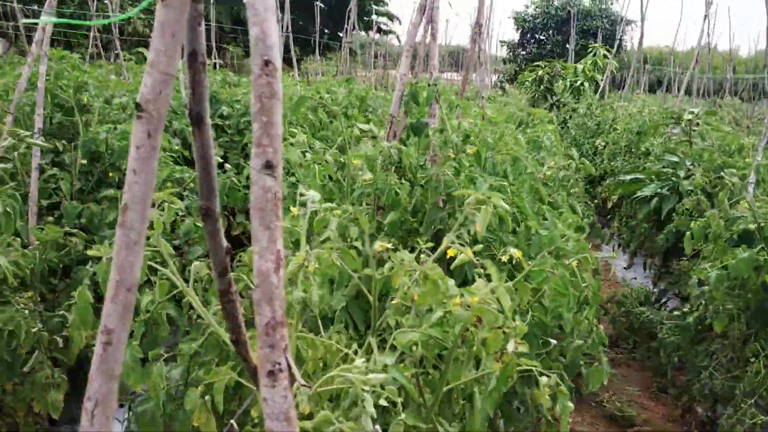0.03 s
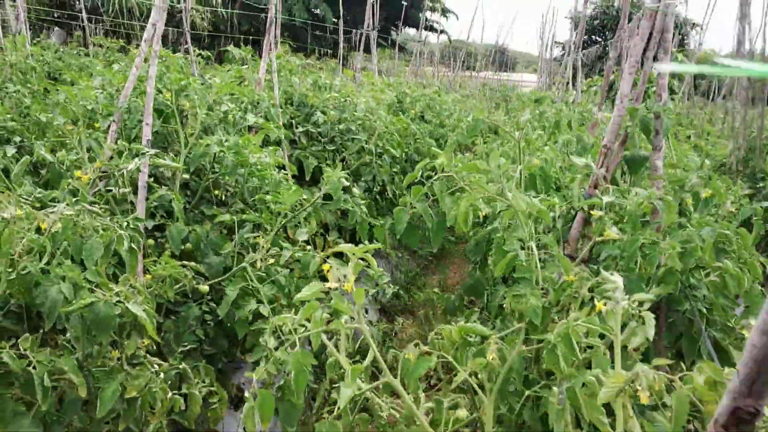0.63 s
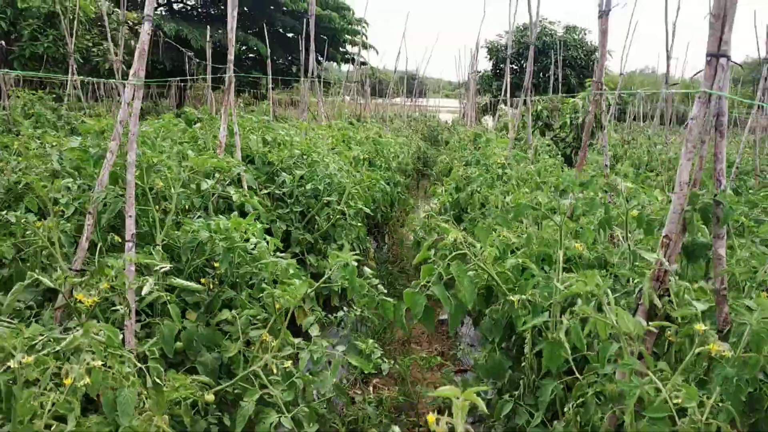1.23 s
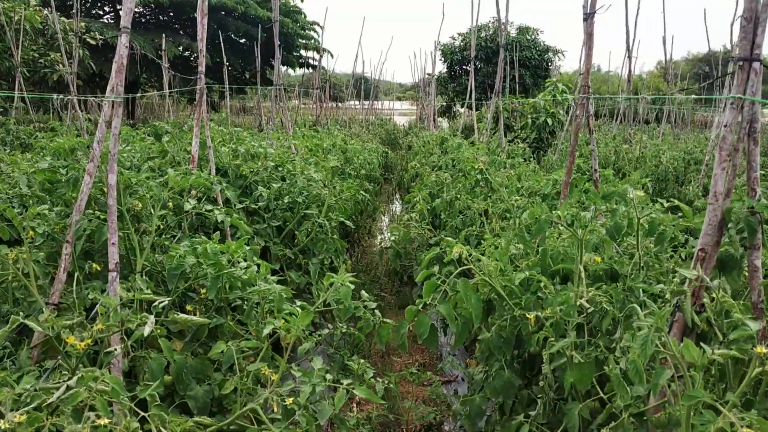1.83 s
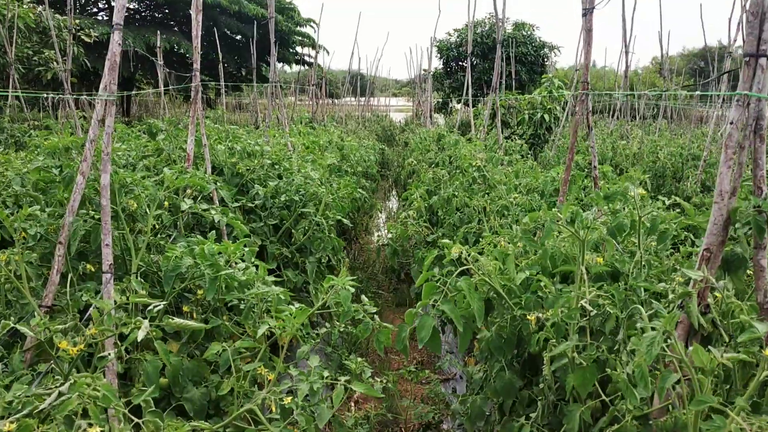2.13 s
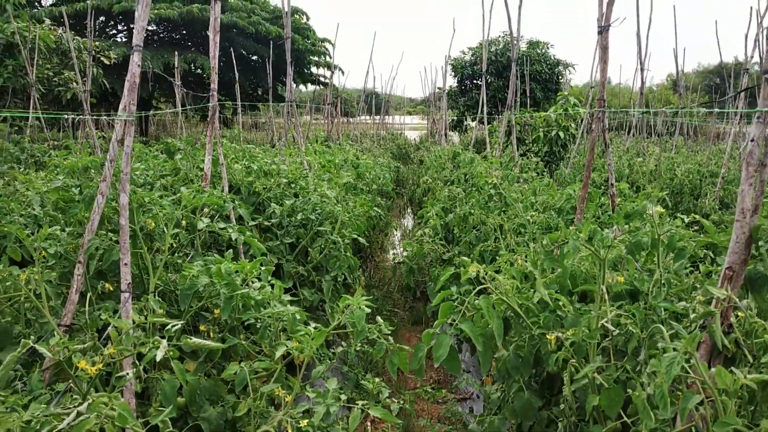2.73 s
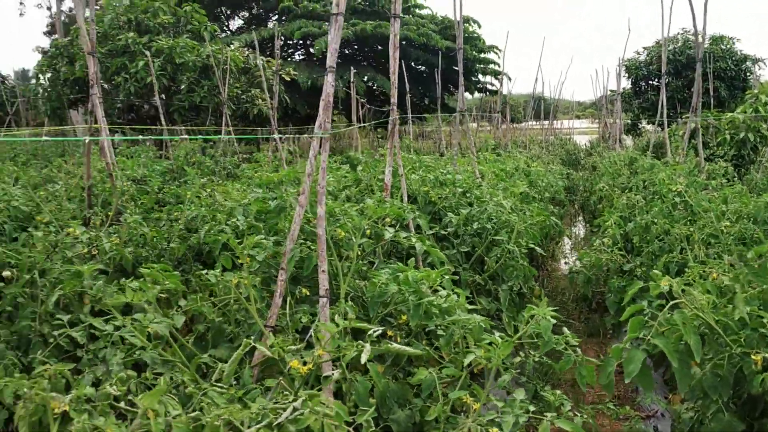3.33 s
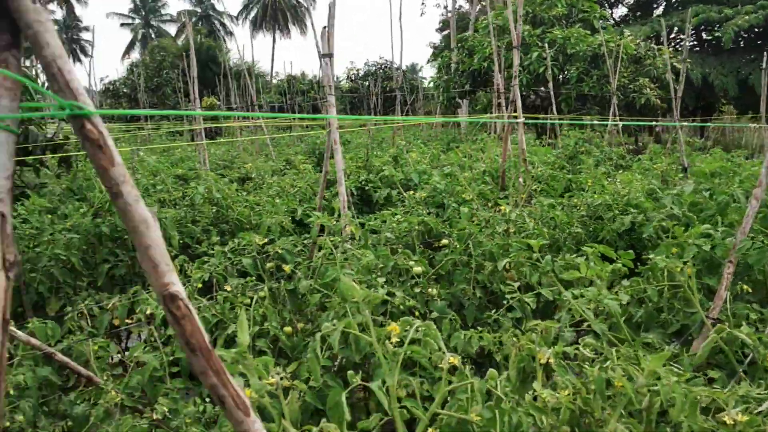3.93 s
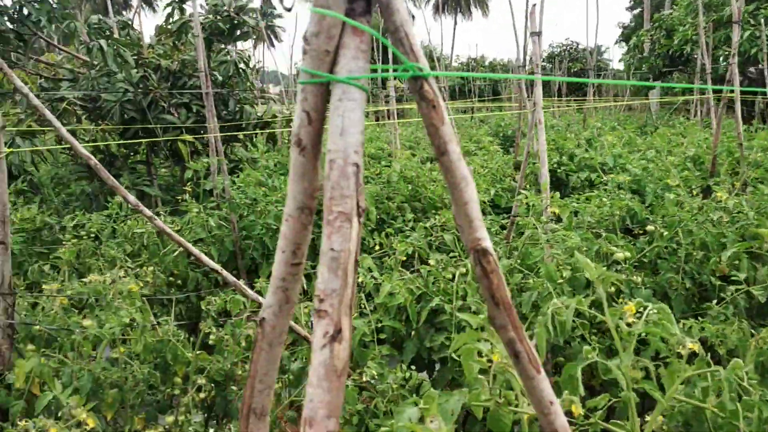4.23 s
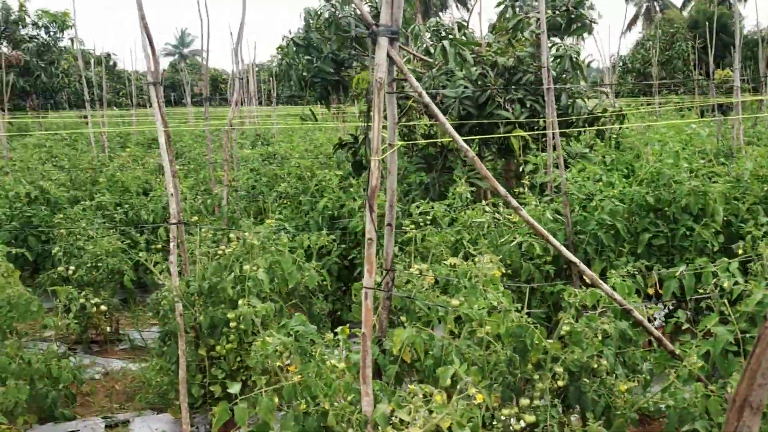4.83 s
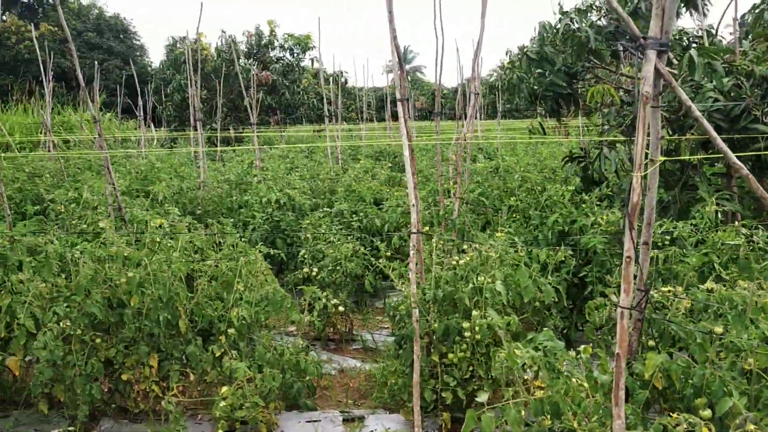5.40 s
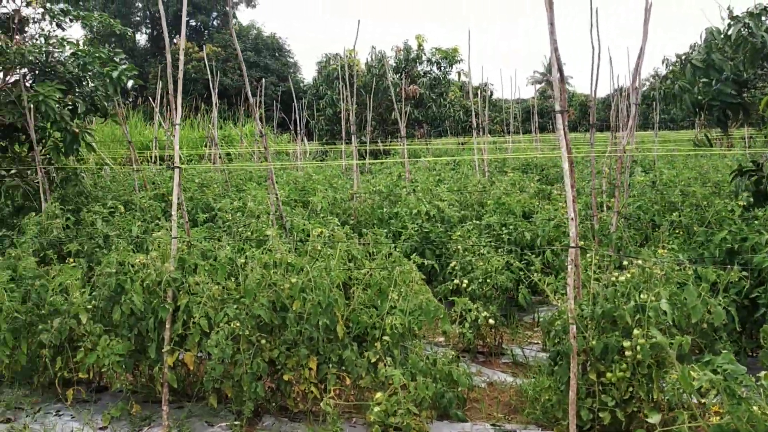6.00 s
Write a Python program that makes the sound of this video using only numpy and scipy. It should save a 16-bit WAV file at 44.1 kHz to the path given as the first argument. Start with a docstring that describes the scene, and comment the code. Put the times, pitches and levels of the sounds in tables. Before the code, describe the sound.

Foliage rustles and crackles close by at first, as a bird slightly to the left rasps and lets out sharp descending whistles. Once the rustling stops, a small bird farther off gives a quick six-part trill. More falling whistles follow, with light twittering, faint hoots and one distant hoarse call. Beneath it all lies the soft hush of an open field, with a breeze bumping the microphone in low puffs.

```python
"""Birds in a field ringed by trees

A near bird's syrinx gives harsh rasps and sharp falling whistles, which the foliage scatters.
Further off a small bird sings a rapid six-part trill; others chip and twitter, and faint hoots and
a hoarse call come from far away. At first leaves brush past, hissing and crackling by friction.
Eddies of breeze rumble on the two microphone ports, over the hush of the open field."""
import sys
import numpy as np
from scipy import signal
from scipy.fft import rfft, irfft
from scipy.io import wavfile
from scipy.ndimage import uniform_filter1d

SR = 44100
rng = np.random.default_rng(int(sys.argv[2]) if len(sys.argv) > 2 else 0)


def materialize(psi):
    """Save the field psi as 16-bit PCM at rate SR to the path in sys.argv[1].

    A 1-D psi becomes a single channel; in a 2-D psi each row is a channel.
    """
    bounded = np.clip(np.atleast_2d(psi).T, -1, 1)
    quanta = np.round(bounded * 32767).astype(np.int16)
    wavfile.write(sys.argv[1], SR, quanta)


N = 271645
TIME = np.arange(N) / SR


def from_db(db):
    """Amplitude ratio of a level in decibels."""
    return 10 ** (np.asarray(db) / 20)


def rms_one(x):
    """Normalisation to unit rms."""
    return x / np.sqrt(np.mean(x ** 2) + 1e-20)


def at_hz(points, hz):
    """Interpolation on a logarithmic frequency axis."""
    f, value = np.transpose(points)
    return np.interp(np.log(hz + 1e-6), np.log(f), value)


def coloured(x, spectrum):
    """Spectral shaping, to unit rms."""
    gain = from_db(at_hz(spectrum, np.fft.rfftfreq(N, 1 / SR)))
    return rms_one(irfft(rfft(x) * gain, N))


def band(x, low_hz, high_hz):
    """Second-order band-pass filtering."""
    return signal.sosfilt(signal.butter(2, [low_hz, high_hz], "band", fs=SR, output="sos"), x)


def drift(rate_hz):
    """Random fluctuation: low-pass noise of unit rms."""
    slow = signal.sosfilt(signal.butter(2, rate_hz, fs=SR, output="sos"), rng.standard_normal(N + SR))
    return rms_one(slow[SR:])


def surge(s, rise, fade):
    """Exponential growth to 1 at time s, then exponential decay."""
    t = TIME - s
    return np.exp(np.maximum(np.minimum(t / rise, -t / fade), -20))


def swell(start, attack, hold, release, db, depth_db=30):
    """An envelope linear in decibels: up by depth_db over the attack, down as much over the release."""
    t = TIME - start
    below = np.clip(np.maximum(1 - t / attack, (t - attack - hold) / release), 0, 4)
    return from_db(db - depth_db * below)


def noisy_tone(pitch, width_hz):
    """Narrow-band noise: two randomly modulated carriers in quadrature round a moving pitch."""
    phase = 2 * np.pi * np.cumsum(pitch) / SR
    return drift(width_hz) * np.sin(phase) + drift(width_hz) * np.cos(phase)


def glides(rows):
    """Linear frequency sweeps, each under a half-sine envelope."""
    out = np.zeros(N + SR)
    for s, length, start_hz, end_hz, db in rows:
        u, first = np.linspace(0, 1, int(length * SR)), int(s * SR)
        phase = 2 * np.pi * np.cumsum(start_hz + (end_hz - start_hz) * u) / SR
        out[first:first + len(u)] += np.sqrt(2) * from_db(db) * np.sin(np.pi * u) * np.sin(phase)
    return out[:N]


def balance(pan_db):
    """Level difference: gains that put the left port pan_db above the right."""
    return from_db([[pan_db / 2], [-pan_db / 2]])


def place(x, pan_db, lag_ms=0):
    """Direction as a level difference at constant power and a delay at the left port."""
    late = np.interp(TIME - lag_ms / 1000, TIME, x)
    return np.array([late, x]) * rms_one(balance(pan_db))


def scatter(x, near_db, near_t60, far_db, far_t60, pan_db):
    """Scattered sound alone: sparse early echoes off leaves and a diffuse tail from field and trees."""
    t = TIME[:SR]
    sparse = rng.standard_normal((2, SR)) * (rng.random((2, SR)) < 1500 / SR) * (t > .003)
    near = sparse * from_db(-60 * t / near_t60)
    far = rng.standard_normal((2, SR)) * from_db(-60 * t / far_t60) * np.minimum(t / .02, 1)
    echoes = sum(from_db(db) * part / np.linalg.norm(part, axis=1, keepdims=True)
                 for db, part in [(near_db, near), (far_db, far)])
    return signal.fftconvolve(x[None], echoes, axes=1)[:, :N] * balance(pan_db)


# Spectrum of the hush. Each row: frequency in Hz, relative density in dB.
AIR_SPECTRUM = [(24, -65), (40, -12.5), (140, -10.5), (193, 2), (242, -1), (500, -5), (728, -6.5),
                (1470, -10.5), (2030, -9.5), (2420, -7.5), (4410, -8.5), (5530, -11.5), (8400, -12),
                (9450, -8.5), (10300, -16), (15800, -14)]
# Its slow change. Each row: time in seconds, level in dB.
AIR_LEVEL = [(0, -48), (1.8, -51.5), (3.2, -51.5), (4.6, -52.5), (6.16, -51.5)]
# Its coherence. Each row: frequency in Hz, correlation between the ports.
AIR_COHERENCE = [(100, 0.35), (300, 0.63), (600, 0.55), (1500, 0.016), (4000, 0.0091), (15000, 0.011)]
# Its direction. Each row: frequency in Hz, left over right in dB.
AIR_BALANCE = [(60, -5), (110, -4.5), (200, 0.5), (380, 0), (700, 1), (1290, 1.5), (2380, 5.5), (4400, 3.5),
               (8120, 2), (15000, -1)]


def air():
    """The hush of the field is diffuse noise, partly coherent between the ports at long wavelengths."""
    hz = np.fft.rfftfreq(N, 1 / SR)
    mid, side = rfft(rng.standard_normal((2, N)))
    coherence, sign = at_hz(AIR_COHERENCE, hz), np.array([[1], [-1]])
    ports = np.sqrt(1 + coherence) * mid + sign * np.sqrt(1 - coherence) * side
    ports *= from_db(sign * at_hz(AIR_BALANCE, hz) / 2)
    level = from_db(np.interp(TIME, *np.transpose(AIR_LEVEL)))
    return coloured(irfft(ports, N), AIR_SPECTRUM) * level


# Spectrum of leaf noise. Each row: frequency in Hz, relative density in dB.
LEAF_SPECTRUM = [(290, -47), (500, -8.5), (876, -1.5), (954, -8), (1750, -1), (1900, -1), (3740, -2.5),
                 (8720, -8.5), (10800, -5), (15500, -11.5)]


def crackle(base_per_s=170, spread_db=4, clump_db=4, pan_spread_db=3.5, decay_cycles=5):
    """Impulse excitation: tiny cracks come in clumps, each ringing a damped resonance of a leaf."""
    out, clumps = np.zeros((2, N)), drift(60)
    for hz in np.geomspace(1300, 14430, 14):
        chance = base_per_s / SR * from_db(clump_db * (clumps + drift(40)))
        onsets = np.flatnonzero(rng.random(N) < chance)
        sizes = from_db(spread_db * np.minimum(rng.exponential(1, len(onsets)), 2.5))
        sizes *= rng.choice([-1, 1], len(onsets))
        clicks = np.zeros((2, N))
        clicks[:, onsets] = sizes * from_db(rng.normal(0, pan_spread_db, (2, len(onsets))))
        radius = np.exp(-hz / (decay_cycles * SR))
        resonator = [1, -2 * radius * np.cos(2 * np.pi * hz / SR), radius ** 2]
        out += rms_one(signal.lfilter([1, 0, -1], resonator, clicks + 1e-18)) * np.sqrt(hz)
    return coloured(out, LEAF_SPECTRUM)


# Plants brushing past. Each row: peak time, rise and decay in seconds, relative levels of
# the hiss and of the scuff in dB.
BRUSHES = [(.01, 0.026, 0.058, -55.5, -69), (0.168, 0.039, 0.079, -40.5, -48.5),
           (.365, 0.015, 0.022, -46.5, -58), (.56, 0.057, 0.12, -52.5, -52), (.745, 0.05, 0.16, -45, -64),
           (.875, 0.13, 0.1, -46, -62), (1.025, 0.032, 0.054, -34.5, -49.5),
           (1.102, 0.035, 0.04, -42.5, -48.5), (1.38, 0.08, 0.059, -50.5, -72),
           (1.657, 0.067, 0.031, -45, -62)]


def leaves(hiss_db=-1.5, crackle_db=-3, coherence=0.25):
    """Friction: sliding leaves hiss with countless tiny slips, and crackle as they bend."""
    slips = rng.standard_normal((3, N))
    hiss = coloured(np.sqrt(coherence) * slips[2] + np.sqrt(1 - coherence) * slips[:2], LEAF_SPECTRUM)
    contact = np.sqrt(sum((from_db(db) * surge(s, rise, fade)) ** 2 for s, rise, fade, db, _ in BRUSHES))
    rustle = from_db(hiss_db) * hiss + from_db(crackle_db) * crackle()
    return rustle * contact * from_db(1.03 * drift(50)) * balance(1.2)


def scuffs(low_hz=900, high_hz=1750):
    """Friction of heavier foliage gives a duller, uneven band of noise."""
    rub = rms_one(band(rng.standard_normal((2, N)) + rng.standard_normal(N), low_hz, high_hz))
    contact = np.sqrt(sum((from_db(db) * surge(s, rise, fade)) ** 2 for s, rise, fade, _, db in BRUSHES))
    return rub * contact * from_db(2 * drift(65)) * balance(3)


# Stems snapping. Each row: time in seconds, peak level before panning in dB, nominal frequency in Hz.
STEM_SNAPS = [(.028, -36, 7000), (.111, -44, 4500), (.378, -33, 11000), (.422, -24.5, 10100),
              (.571, -32, 1890), (.821, -28.5, 1990), (0.943, -34, 2480), (1.023, -26, 11000),
              (1.029, -22, 10100), (1.062, -40, 1930), (1.077, -33, 7000), (1.113, -25, 9000),
              (1.1351, -26, 3300), (1.145, -21.5, 2840), (1.156, -29.5, 3280), (5.084, -29, 1300),
              (5.188, -34.5, 1430)]


def stem_snaps(decay_s=0.00086):
    """Fracture: a stem releases its strain in a broad, quickly decaying burst of noise."""
    snaps, t = np.zeros(N), TIME[:SR // 20]
    for s, db, hz in STEM_SNAPS:
        crack = band(rng.standard_normal(len(t)) * np.exp(-t / decay_s), hz / 2.54, hz * 1.36)
        snaps[int(s * SR):int(s * SR) + len(t)] += from_db(db) * crack / np.abs(crack).max()
    return place(snaps, pan_db=10)


# Single puffs. Each row: peak time and decay in seconds, pitch in Hz, left and right relative
# levels in dB.
PUFFS = [(.053, 0.0082, 200.4, -49, -22), (.112, 0.01, 223, -51, -19), (.165, 0.03, 192.4, -39.5, -36),
         (.21, 0.027, 200, -38.5, -63), (.29, 0.058, 199, -62, -32.5), (.617, 0.0021, 188, -61, -31),
         (.819, 0.013, 218, -64, -40), (1.239, 0.0079, 215, -49, -21), (1.262, 0.0047, 218, -58, -28),
         (1.944, 0.071, 199.3, -41, -66), (2.222, 0.014, 221, -18.5, -41), (2.236, 0.017, 359, -27, -51),
         (2.284, 0.0072, 239, -32, -45), (2.322, 0.014, 218, -30.5, -49), (2.497, 0.013, 184, -27, -31),
         (2.527, 0.008, 215, -51, -20.5), (2.556, 0.0096, 216, -57, -31), (2.584, 0.015, 208, -52, -34.5),
         (2.692, 0.015, 218, -42, -39.5), (3.68, 0.034, 218, -65, -30.5), (3.725, 0.01, 226, -57, -25.5),
         (3.844, 0.0073, 238, -53, -24), (3.871, 0.039, 207, -67, -31.5), (4.129, 0.016, 205, -55, -37.5),
         (4.267, 0.006, 194, -68, -38.5), (4.297, 0.0043, 220, -36.5, -48),
         (4.649, 0.038, 207.6, -62, -38.5), (5.083, 0.0038, 268, -43, -40.5),
         (5.992, 0.02, 197, -76, -39.5), (6.15, 0.02, 189, -67, -39.5)]
# Spells of lighter puffs. Each row: start and length in seconds, left and right relative levels in dB.
PUFF_SPELLS = [(0.367, .21, -60, -41.5), (1.047, .12, -54, -42), (2.112, .1, -36, -36.5),
               (2.29, .08, -39, -39), (2.41, .08, -39.5, -39), (2.805, .14, -49, -46),
               (3.34, .12, -75, -44), (4.292, .19, -61, -42.5), (4.83, .29, -46, -42)]
# Turbulence of a puff at the usual pitch. Each row: frequency in Hz, relative density in dB.
TURBULENCE_SPECTRUM = [(30, -27), (60, -9.5), (110, -1), (160, 3), (215, -5), (280, -1.5), (420, -12),
                       (650, -22), (1200, -55)]


def breeze(usual_hz=200.8, wander=0.1097, turbulence_db=-5, rise_s=0.0064, rounding_s=0.0026,
           spell_gap_s=0.058, spell_fade_s=0.024):
    """Turbulent pressure: each eddy shakes a port for a few low cycles, then dies away."""
    pitch = usual_hz * (1 + wander * np.array([drift(59.9), drift(59.9)]))
    shake = np.sqrt(2) * np.sin(2 * np.pi * np.cumsum(pitch, axis=1) / SR)
    turbulence = coloured(rng.standard_normal((2, N)), TURBULENCE_SPECTRUM)
    eddies = rms_one(shake + from_db(turbulence_db) * turbulence)
    puffs, out = list(PUFFS), np.zeros((2, N))
    for start, length, left_db, right_db in PUFF_SPELLS:
        for k, (late, left, right) in enumerate(rng.uniform(-0.632, 0.607, size=(8, 3))):
            if k * spell_gap_s < length:
                s = start + (k + 0.195 * late) * spell_gap_s
                puffs.append((s, spell_fade_s, usual_hz, left_db + 3 * left, right_db + 3 * right))
    for (s, fade, hz, left_db, right_db), origin in zip(puffs, rng.uniform(1, TIME[-1] - 2, size=100)):
        near = np.abs(TIME - s) < .5
        scaled_time = origin + (TIME[near] - s) * hz / usual_hz  # shifts the eddy to this puff's pitch
        eddy = [np.interp(scaled_time, TIME, port) for port in eddies]
        envelope = uniform_filter1d(surge(s, rise_s, fade)[near], int(rounding_s * SR))
        out[:, near] += from_db([[left_db], [right_db]]) * eddy * envelope
    return band(out, 85, 470)


# The near bird's rasps. Each row: start, attack, hold and release in seconds, relative level in dB,
# start and end pitch in Hz, settling time in seconds, trims of the bright bands and the low band in dB.
RASPS = [(0.146, 0.033, 0.18, 0.07, -43, 4700, 3063, .05, 2.5, -7.5),
         (.765, 0.012, 0.023, 0.11, -47, 2806, 2298, .03, -6, -14),
         (3.45, 0.0024, 0.18, 0.1, -43.5, 4250, 2246, .125, 0.5, -3.5)]


def rasps(pulses_per_s=115, throb_db=5.5, accent_db=3.5, accent_s=0.021):
    """Chaotic vibration of the syrinx: bands of noise pulse unevenly and dull as the pitch sinks."""
    voice = np.zeros(N)
    pulse_phase = 2 * np.pi * np.cumsum(pulses_per_s * (1 + 0.234 * drift(61))) / SR
    throb = rms_one(from_db(throb_db * np.sin(pulse_phase)))
    for s, attack, hold, release, db, start_hz, end_hz, settle, bright_db, low_db in RASPS:
        pitch = end_hz + (start_hz - end_hz) * np.exp(-np.maximum(TIME - s, 0) / settle)
        upper = from_db(-11) * rms_one(band(rng.standard_normal(N), 4900, 8700)) * (pitch / 3800) ** 3
        under = from_db(low_db - 11) * noisy_tone(1020 + .25 * pitch, width_hz=100) * 3000 / pitch
        hiss = from_db(-16) * rms_one(band(rng.standard_normal(N), 3200, 18000)) * pitch / 3500
        bands = noisy_tone(pitch, width_hz=390) + under + from_db(bright_db) * (upper + hiss)
        accent = from_db(accent_db * surge(s, attack, accent_s))
        voice += bands * throb * accent * swell(s, attack, hold, release, db)
    echoes = scatter(voice, near_db=2, near_t60=0.06, far_db=-2, far_t60=0.45, pan_db=3.5)
    return from_db(-2) * place(voice, pan_db=8) + echoes


# The near bird's whistles. Each row: left over right in dB, left delay in ms, echo trim in dB, weights
# of harmonics 2 to 5 in dB, and a course of points: time in seconds, pitch in Hz, relative level in dB.
WHISTLES = [ (4.1, 0.019, 3.5, (-22, -19, -45, -45), [(.506, 4420, -51), (.513, 4365, -32),
            (.525, 4275, -26.5), (.545, 3780, -21.5), (.562, 3500, -22), (.573, 3320, -25),
            (.58, 2750, -33.5)]), (2.5, 0.073, -0.5, (-13, -16.5, -31, -25), [(.663, 3170, -48),
            (.673, 3120, -27), (.683, 3276, -19), (.699, 3650, -21.5), (.73, 3073, -21), (.76, 2823, -32.5),
            (.783, 2570, -38), (.8, 2170, -43)]), (8.5, 0.132, 0.5, (-21.5, -15.5, -39, -45),
            [(3.793, 4150, -35), (3.801, 4235, -38), (3.813, 4300, -25.5), (3.828, 4000, -17.5),
            (3.845, 3760, -22.5), (3.857, 3575, -24.5), (3.866, 3110, -27), (3.874, 2190, -44)]),
            (2.7, -0.099, .5, (-19.5, -25, -21, -14.5), [(3.955, 3320, -40), (3.974, 3500, -33.5),
            (3.987, 3790, -27.5), (4.01, 3380, -26.5), (4.034, 2950, -25), (4.058, 2360, -27),
            (4.07, 2306, -32), (4.082, 2330, -39)]), (6.9, 0.188, -0.5, (-21.5, -21, -26, -17),
            [(5.281, 5730, -40.5), (5.296, 5760, -31.5), (5.321, 5325, -27.5), (5.347, 5240, -29.5),
            (5.368, 4700, -25), (5.38, 4215, -28), (5.386, 4260, -27), (5.398, 4010, -22),
            (5.419, 3575, -26), (5.45, 2680, -25), (5.472, 2367, -27.5), (5.515, 2050, -36),
            (5.543, 1990, -43)]), (8, .1, -0.5, (-20, -30, -40, -40), [(6.079, 5680, -39),
            (6.089, 5650, -28.5), (6.104, 5550, -33.5), (6.122, 5290, -26), (6.139, 5306, -25.5),
            (6.16, 4670, -22)])]
# Filtering of the overtones by throat and beak. Each row: frequency in Hz, gain in dB.
BEAK_RESPONSE = [(5500, -5), (7000, -3.5), (8400, 7.5), (9800, -2), (11000, -6.5), (12600, -0.5),
                 (14000, 4), (15500, 0)]


def whistles(edge_s=0.0021, flutter_db=1.74, jitter_rad=0.56, full_db=-28, echo_band_hz=(2280, 7600)):
    """Self-sustained oscillation of the syrinx: a falling tone whose rough overtones fade as it sinks."""
    direct, to_foliage = np.zeros((2, N)), np.zeros(N)
    waver = 1 + 0.00138 * drift(114) + 0.0019 * drift(48)
    flutter = from_db(flutter_db * drift(140))
    jitter, breakup = jitter_rad * drift(350), from_db(4.1 * drift(75))
    for pan_db, lag_ms, echo_db, weights, course in WHISTLES:
        s, hz, db = np.transpose(course)
        pitch, level_db = np.interp(TIME, s, hz), np.interp(TIME, s, db)
        gate = np.clip(1 + np.minimum(TIME - s[0], s[-1] - TIME) / edge_s, 0, 1)
        phase = 2 * np.pi * np.cumsum(pitch * waver) / SR
        overtones = np.zeros(N)
        for k, weight_db in enumerate(weights, 2):
            gain = from_db(weight_db + at_hz(BEAK_RESPONSE, k * pitch)) * (k * pitch < SR / 2)
            overtones += gain * np.sin(k * (phase + jitter))
        overtones *= breakup * np.minimum(pitch / 4000, 1) ** 2.8
        overtones *= from_db(full_db + 0.14 * (level_db - full_db))  # they follow the level only weakly
        note = np.sqrt(2) * (from_db(level_db) * np.sin(phase) + overtones) * flutter * gate
        direct += place(note, pan_db, lag_ms)
        to_foliage += from_db(echo_db) * note
    dull = band(to_foliage, *echo_band_hz)  # foliage scatters little of the lows and absorbs the top
    echoes = scatter(dull, near_db=-7.5, near_t60=0.24, far_db=-19, far_t60=0.78, pan_db=5.5)
    return from_db(-2) * direct + echoes


# Faint side notes. Each row: start and length in seconds, start and end pitch in Hz, level in dB.
SECOND_VOICE = [(.504, 0.046, 5830, 5150, -46), (3.795, 0.031, 6000, 5640, -45),
                (3.82, 0.035, 5840, 5650, -51), (4.028, 0.019, 5850, 5700, -54)]


def second_voice():
    """Biphonation: the other side of the syrinx sounds faintly at a pitch of its own."""
    return place(glides(SECOND_VOICE) * (1 + .5 * drift(200)), pan_db=21)


def from_afar(call):
    """Propagation over the field: the direct call and its weaker reflections."""
    echoes = scatter(call, near_db=-6, near_t60=0.098, far_db=-16, far_t60=0.9, pan_db=5)
    return from_db(-1.5) * place(call, pan_db=4) + echoes


# Far hoots. Each row: start and length in seconds, start and end pitch in Hz, relative level in dB.
HOOTS = [(.53, .14, 650, 612, -58.5), (1.93, 0.19, 622, 665, -61.5), (2.08, 0.16, 590, 558, -67),
         (3.19, 0.27, 705, 666, -61), (3.88, 0.2, 585, 602, -63.5), (4.07, 0.3, 585, 640, -65.5),
         (5.11, 0.083, 587, 650, -60), (5.16, .16, 688, 600, -58), (5.68, 0.29, 680, 690, -68),
         (5.7, 0.19, 917, 920, -65)]


def hoots(waver_db=3, blur_rad=0.65):
    """Random modulation of phase and amplitude blurs low tones that come from a distance."""
    blurred = np.real(signal.hilbert(glides(HOOTS)) * np.exp(1j * blur_rad * drift(32)))
    return from_afar(blurred * from_db(2 + waver_db * drift(37)))


# Strokes of one syllable. Each row: offset and length in seconds, start and end pitch in Hz,
# relative level in dB.
STROKES = [(-.039, 0.0133, 7270, 5840, -0.5), (-.025, 0.0203, 7030, 5630, 0.5),
           (-.007, 0.013, 3764, 3920, 2.5), (.007, 0.0127, 4300, 5150, 4.5), (.015, 0.0137, 4980, 6760, -1)]
# Syllables of the trill. Each row: time in seconds, factor on the pitch span above the lowest note,
# relative level in dB, extra level of the lowest stroke in dB.
SYLLABLES = [(2.380, 1.09, -1.2, -3.5), (2.5, 1.02, 0, -1), (2.624, 1, -0.53, 0),
             (2.753, 0.98, -0.38, -0.5), (2.881, .94, -0.65, 0), (3.009, 0.86, 0.92, -7)]


def trill(base_db=-45, pitch_spread=0.014, rough_db=3.5, echo_band_hz=(3800, 9000)):
    """Frequency modulation: a bird deep in foliage repeats a syllable of sweeps, its top sinking."""
    lowest, strokes = STROKES[2][2], []
    for s, span, db, low_db in SYLLABLES:
        for offset, length, start_hz, end_hz, stroke_db in STROKES:
            detune = 1 + pitch_spread * rng.standard_normal()
            pitches = detune * (lowest + (np.array([start_hz, end_hz]) - lowest) * span)
            level_db = base_db + db + stroke_db + low_db * (start_hz == lowest)
            strokes.append((s + offset, length, *pitches, level_db))
    song = glides(strokes) * from_db(rough_db * drift(430))
    reflected = band(song, *echo_band_hz)
    echoes = scatter(reflected, near_db=-3, near_t60=0.12, far_db=-4, far_t60=0.9, pan_db=1.5)
    return from_db(-3.5) * place(song, pan_db=-4) + echoes


# Bouts of twittering. Each row: start and length in seconds, ticks per second, mean level in dB.
TWITTER_BOUTS = [(3.081, .34, 28, -55), (4.446, 0.14, 170, -58), (4.622, 0.57, 28, -56.5),
                 (5.597, 0.36, 12, -59)]


def twitter(spread_db=8):
    """A random point process: far birds tick in bouts, each tick with its own pitch and strength."""
    strokes = []
    for s, length, per_s, db in TWITTER_BOUTS:
        for when, duration, height, strength in rng.random((int(per_s * length), 4)):
            hz, level_db = 3800 + 1500 * height, db + spread_db * (strength - .5)
            strokes.append((s + when * length, 0.0063 + 0.0105 * duration, hz, hz - 700, level_db))
    ticks = glides(strokes)
    echoes = scatter(ticks, near_db=-6, near_t60=0.1, far_db=-14, far_t60=0.4, pan_db=7)
    return place(ticks, pan_db=12) + echoes


# Lone chips. Each row: start and length in seconds, start and end pitch in Hz, level in dB.
CHIPS = [(3.155, 0.01, 4300, 5170, -48.5), (3.277, 0.0097, 4110, 4740, -43.5),
         (3.522, 0.03, 4170, 4970, -47), (3.771, 0.0091, 4000, 4800, -38.5),
         (4.044, 0.011, 4180, 4640, -43.5), (4.912, 0.0068, 5460, 3600, -53),
         (5.036, 0.0163, 4360, 3330, -50), (5.776, 0.0085, 4620, 4470, -46),
         (5.982, 0.018, 4290, 3760, -52), (6.051, 0.012, 4600, 4200, -45)]


def chips():
    """Brief frequency sweeps from nearer birds, whose direct sound outweighs the echoes."""
    notes = glides(CHIPS)
    echoes = scatter(notes, near_db=-5, near_t60=0.046, far_db=-6, far_t60=0.76, pan_db=6)
    return place(notes, pan_db=10) + echoes


# A far hoarse call. Each row: start, attack, hold and release in seconds, relative level in dB.
HOARSE_CALL = [(4.98, 0.16, 0.17, 0.56, -52)]
# Resonances of the throat. Each row: centre and width in Hz, gain in dB.
FORMANTS = [(610, 320, 5.5), (1330, 210, 8), (1790, 240, 3), (2250, 1950, 2.5)]


def hoarse_call():
    """Source and filter: a noisy voice is shaped by the resonances of the throat."""
    throat = sum(from_db(db) * band(rng.standard_normal(N), hz - width / 2, hz + width / 2)
                 for hz, width, db in FORMANTS)
    return from_afar(rms_one(throat) * sum(swell(*call) for call in HOARSE_CALL))


def scene():
    """Superposition of birds, plants and breeze on the hush of the field."""
    near_bird = whistles() + second_voice() + rasps()
    other_birds = trill() + chips() + twitter() + hoots() + hoarse_call()
    plants = leaves() + stem_snaps() + scuffs()
    return near_bird + other_birds + plants + breeze() + air()


def record(dry, low_cut_hz=85, high_cut_hz=15900):
    """Band limiting: the microphone loses the deep bass, and the top is cut steeply."""
    thin = signal.sosfilt(signal.butter(2, low_cut_hz, "high", fs=SR, output="sos"), dry)
    return signal.sosfilt(signal.ellip(12, .1, 95, high_cut_hz, fs=SR, output="sos"), thin)


dry = scene()
out = record(dry)
materialize(out)
```